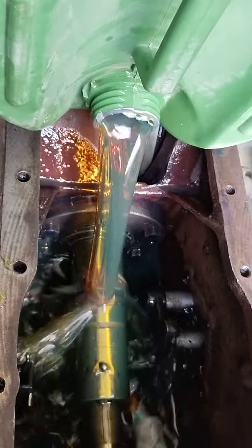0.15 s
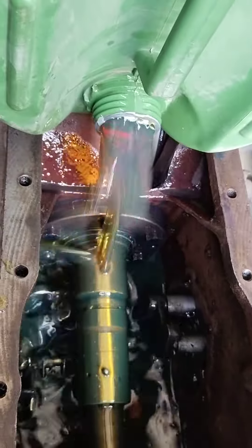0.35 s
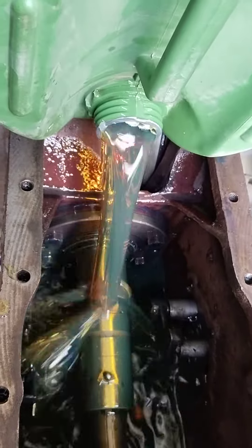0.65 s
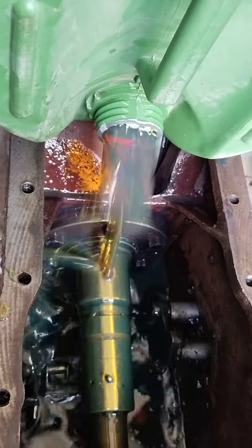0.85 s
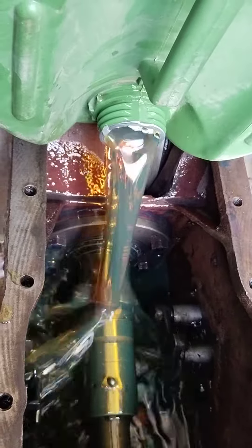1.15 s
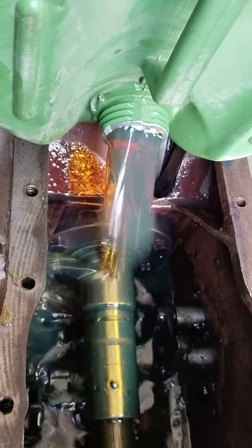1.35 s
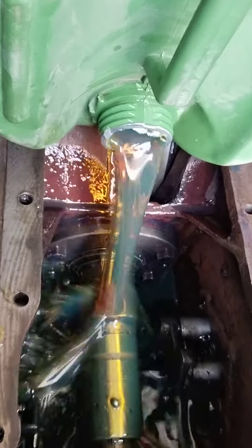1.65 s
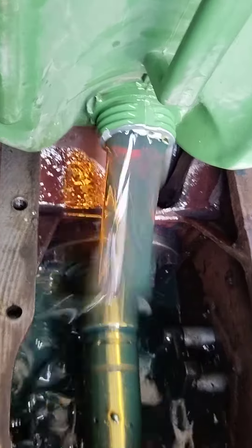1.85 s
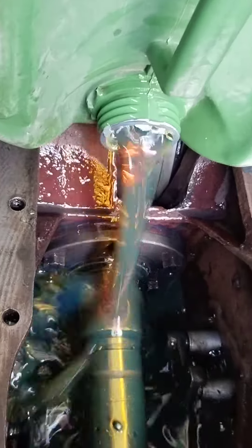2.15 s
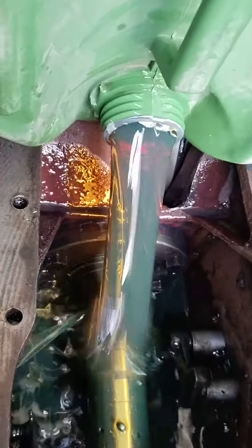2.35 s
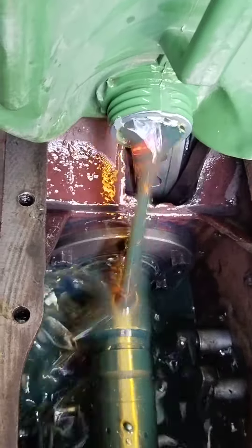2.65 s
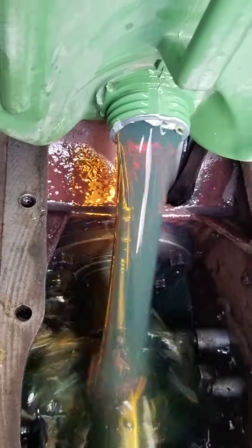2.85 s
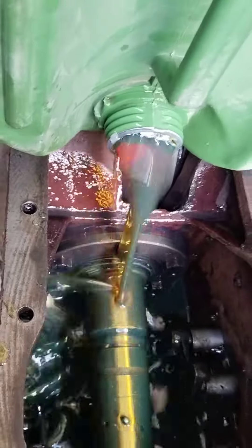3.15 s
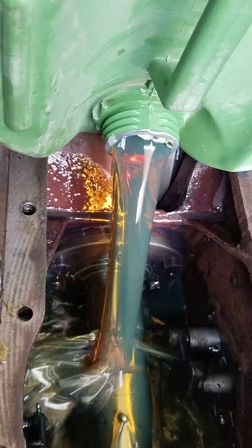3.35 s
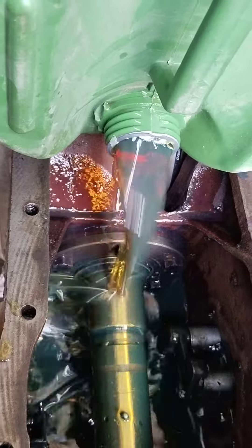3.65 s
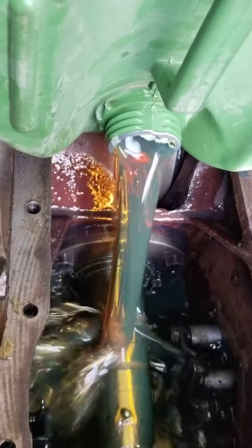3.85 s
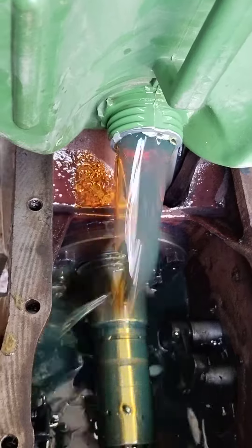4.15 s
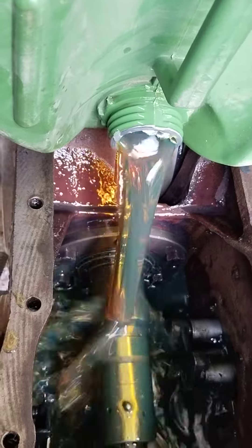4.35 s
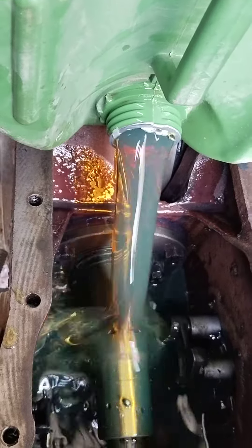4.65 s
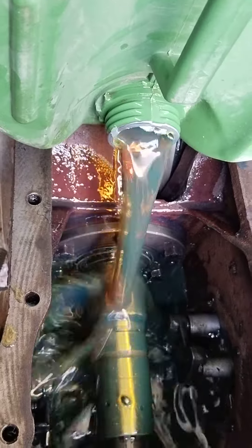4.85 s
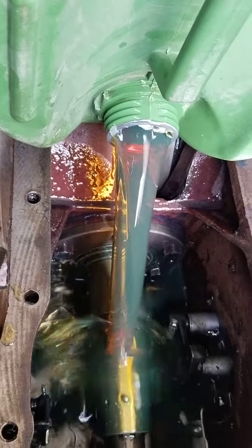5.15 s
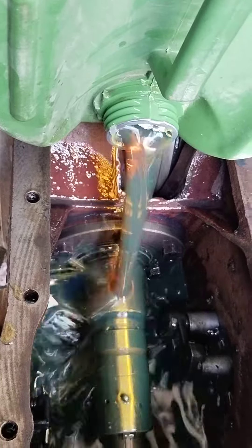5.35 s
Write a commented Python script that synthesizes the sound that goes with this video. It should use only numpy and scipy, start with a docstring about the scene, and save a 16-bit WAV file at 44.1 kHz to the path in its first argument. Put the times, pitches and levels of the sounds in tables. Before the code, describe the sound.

Rhythmic glugging in a shed, heard from close up: each surge of oil brings crackling wet smacks, fizzing spray and hollow bubbles, briefly ringing in the metal casing. Dull jug thumps start faint and become clearer after about a second. Behind lie a steady low rumble, a faint hum early on, three far echoing sparrow chirps and two slight creaks.

```python
"""A low rumble and a faint hum hold the shed, and at once thick oil slaps onto a shaft in an open gear case.
The oil is close and glugs from a plastic jug in surges: noise bursts make the splats and spray, and
sine waves the bubbles, air pockets and thumps of the jug as it gulps air.
Far off a sparrow chirps, a gliding whistle heard mostly through the shed's echoes.
Something creaks faintly: a train of slips knocking a few resonances."""
import sys
import numpy as np
from scipy import signal
from scipy.fft import rfft, irfft, next_fast_len
from scipy.io import wavfile
from scipy.ndimage import uniform_filter1d

SR = 44100
rng = np.random.default_rng(int(sys.argv[2]) if len(sys.argv) > 2 else 0)


def wav_out(sig):
    """Save sig, one row per channel (or a flat mono array), as 16-bit PCM at SR to the path in sys.argv[1]."""
    wavfile.write(sys.argv[1], SR, np.round(np.clip(np.atleast_2d(sig).T, -1, 1) * 32767).astype(np.int16))


N = 242550  # 5.5 s

# Shed air and rumble, spectrum before its level is set: pitch_hz [Hz], level_db [dB per Hz]
AIR_SPECTRUM = [(15, -30), (25, -8.5), (84, 10), (565, -20), (692, -15.5), (2460, -30), (3510, -56),
                (9430, -59), (10700, -40), (13900, -82), (22000, -120)]
AIR_DB = -53.5  # level at the start, dB
# Faint wavering hums in the shed: start_s [s], length_s [s], pitch_hz [Hz], level_db [dB]
HUMS = [(0, 0.77, 271.5, -62.5), (1.57, 0.15, 465, -66)]
# Faint buzzing creaks: start_s [s], length_s [s], first_slips and last_slips [per s], dry level_db [dB]
CREAKS = [(3.678, 0.21, 76.2, 77.2, -53), (4.161, 0.19, 72, 78.7, -59)]
# Resonances of the creaking thing: nominal pitch_hz [Hz], width_hz [Hz], level_db [dB]
CREAK_RESONANCES = [(1264, 80, -2), (1660, 73, 6), (1934, 33, 10), (2200, 39, -24)]
# The sparrow's two notes: delay_s [s], rise_s [s], hold_s [s], fall_s [s], top_hz [Hz],
# first_db and last_db [dB, added to the level of the chirp]
CHIRP_NOTES = [(0.015, 0.014, 0.017, 0.026, 5890, 9, 11.5), (0.1, 0.03, 0.0071, 0.021, 5105, 19.5, 2.7)]
# Each chirp of the sparrow: start_s [s], level_db [dB, before the note levels]
CHIRPS = [(1.493, -52.5), (3.207, -51.5), (4.843, -49.5)]
CHIRP_FOOT_HZ = 3830  # where each note starts and ends
# Glugs of the jug: gulp_s [s], nominal thump_db [dB], spray_db of the surge [dB]
GULPS = [(0.273, -67, -39), (0.789, -60, -45.5), (1.302, -42, -48.5), (1.774, -42, -45.5),
         (2.259, -48, -43.5), (2.688, -34.5, -44.5), (3.144, -42, -45.5), (3.591, -41, -48),
         (4.047, -40.5, -47), (4.503, -39, -48.5), (4.962, -40.5, -44), (5.424, -36.5, -47)]
THUMP_HZ, THUMP_SAG_HZ_PER_S = 193.4, 22.5  # thumps deepen as the air space in the jug grows
JUG_HZ, JUG_T60_S = 181.2, 0.48  # the jug wall rings on after each thump
SURGE_LEAD_S, SURGE_LAG_S = .21, .115  # a surge starts before its gulp and is choked after it
TRICKLE_DB = -63  # spray of the thin stream between surges, before the case rings
# Colour of oil on steel, relative spectrum: pitch_hz [Hz], level_db [dB per Hz]
OIL_COLOUR = [(290, -8), (500, -25), (734, -8.5), (1410, 1.5), (3420, 9), (9410, 1.5), (10700, -11.5),
              (13900, -42), (22000, -120)]
# Large bubbles under the stream: time_s [s], nominal level_db [dB], pitch_hz [Hz], t60_s [s]
# (pitch and decay before the adjustments in bubbles())
BUBBLES = [(0.199, -32, 1150, 0.052), (0.243, -34.5, 1065, 0.07), (0.243, -39.5, 750, 0.095),
           (0.304, -40, 705, 0.036), (0.385, -36.5, 1113, 0.038), (0.56, -38, 822, 0.12),
           (0.679, -34.5, 1120, 0.055), (0.733, -37.5, 924, 0.076), (0.83, -40, 1147, 0.054),
           (1.156, -26, 1122, 0.067), (1.225, -39, 1100, 0.056), (1.303, -41.5, 1098, .08),
           (1.322, -38, 1434, 0.071), (1.325, -45, 650, 0.064), (1.594, -36.5, 878, 0.049),
           (2.072, -38.5, 960, 0.026), (2.247, -23.5, 1080, 0.032), (2.262, -40.5, 717, 0.037),
           (2.617, -31, 1044, 0.026), (2.679, -33, 731, 0.14), (2.712, -36, 624, 0.036),
           (2.748, -34, 950, 0.082), (3.051, -41.5, 1002, 0.11), (3.133, -43, 684, 0.34),
           (3.174, -32, 638, 0.022), (3.177, -37, 1330, 0.053), (3.45, -35.5, 902, 0.071),
           (3.593, -41, 695, 0.057), (3.655, -46.5, 1012, 0.11), (3.899, -31, 1287, 0.035),
           (4.049, -36.5, 690, 0.11), (4.11, -28, 727, 0.083), (4.42, -33, 1013, 0.11),
           (4.512, -41.5, 725, 0.052), (4.966, -33.5, 750, 0.078), (5.355, -44, 1030, 0.071)]
# Loud air pockets trapped in the splash: time_s [s], nominal level_db [dB], pitch_hz [Hz], length_s [s]
# (pitch and length before the adjustments in pockets())
POCKETS = [(0.083, -29.5, 1760, 0.0086), (0.103, -35.5, 3370, 0.0072), (0.168, -34.5, 4010, 0.0079),
           (0.206, -23.5, 3480, 0.0036), (0.209, -28, 2326, 0.0055), (0.223, -37, 3900, 0.0058),
           (0.305, -35.5, 1950, 0.013), (0.389, -28, 2600, 0.0048), (0.411, -37.5, 4740, 0.0047),
           (0.703, -35, 2500, 0.0037), (0.714, -34, 3845, 0.0023), (0.744, -36, 2390, 0.005),
           (0.891, -29, 2636, 0.0056), (1.062, -35, 3725, 0.0058), (1.134, -36, 4090, 0.005),
           (1.233, -33.5, 1940, 0.0075), (1.36, -40, 2490, 0.0078), (1.67, -32, 3930, 0.004),
           (1.683, -29, 3545, 0.007), (1.776, -36, 4168, 0.0052), (1.873, -41.0, 3000, 0.0061),
           (2.071, -40.5, 3486, 0.008), (2.155, -30.5, 4380, 0.0063), (2.248, -36, 1813, 0.0071),
           (2.533, -32, 5050, 0.0063), (2.534, -35, 2910, 0.0058), (2.612, -33.5, 3430, 0.0089),
           (2.66, -32, 4440, 0.0032), (2.988, -37.5, 1826, 0.0088), (3.002, -33.5, 1860, 0.0033),
           (3.104, -33.0, 5430, 0.0028), (3.135, -32.5, 2615, 0.0058), (3.437, -37, 1940, 0.018),
           (3.509, -32, 5140, 0.0052), (3.534, -31, 2814, 0.011), (3.574, -32.5, 2017, 0.0064),
           (3.596, -37, 3480, 0.0042), (3.648, -39, 2228, 0.0074), (3.886, -34.5, 1918, 0.011),
           (3.91, -27, 2564, 0.011), (3.928, -20.5, 3458, 0.0054), (4.028, -33.5, 4090, 0.0054),
           (4.339, -37, 2020, 0.013), (4.371, -26.5, 3530, 0.0054), (4.384, -22.5, 2230, 0.0068),
           (4.42, -36, 4940, 0.0068), (4.42, -29, 2740, 0.01), (4.459, -29.5, 3460, 0.0083),
           (4.545, -21.5, 5070, 0.0038), (4.829, -35.5, 3240, 0.0076), (4.89, -30, 4730, 0.0065),
           (4.938, -26, 2014, 0.0037), (4.986, -34.5, 3600, 0.0054), (5.012, -36.5, 5350, 0.0029),
           (5.067, -42, 2014, 0.0096), (5.254, -34.5, 2285, 0.0034), (5.292, -30, 6500, 0.0044),
           (5.364, -32.5, 4350, 0.0054), (5.425, -32.0, 4900, 0.0021)]
# Lesser pockets at random in the surges: low_hz [Hz], high_hz [Hz], top level_db [dB], spread_db [dB]
SMALL_POCKETS = (1495, 5506, -38.5, 4.5)
SMALL_POCKET_S, SMALL_DELAY_S = 0.0062, .06  # nominal length; how long they go on after the gulp
# Loud sheets of oil that burst into fizz on the shaft: time_s [s], nominal level_db [dB]
SPLATS = [(0.044, -48.5), (0.0785, -32.5), (0.2755, -40.5), (0.382, -38.5), (0.411, -61), (0.596, -45.5),
          (0.6183, -35.5), (0.673, -49), (0.711, -39.5), (0.837, -43), (0.891, -45), (0.941, -55.5),
          (1.1107, -39), (1.195, -33.5), (1.226, -41.5), (1.3013, -48.5), (1.359, -39.5), (1.4501, -51.5),
          (1.5927, -35.5), (1.6788, -38.5), (1.8114, -47.5), (2.027, -51.5), (2.071, -34), (2.155, -40.5),
          (2.3137, -48), (2.516, -49), (2.535, -36), (2.654, -42), (2.7113, -40.5), (2.9807, -36.5),
          (3.049, -40), (3.121, -41), (3.4354, -36.5), (3.472, -36), (3.515, -42), (3.629, -38),
          (3.6516, -45.5), (3.709, -48), (3.897, -35.5), (3.911, -35.5), (3.9688, -40), (4.009, -36),
          (4.078, -42.5), (4.105, -41), (4.367, -28.5), (4.4273, -44), (4.46, -33), (4.5443, -25.5),
          (4.805, -41.5), (4.828, -36.5), (4.881, -44), (5.0365, -38), (5.2908, -55), (5.3567, -47),
          (5.422, -39)]
# Hollow resonances of the gear case: pitch_hz [Hz]
CASE_HZ = [700, 1059, 1890, 2217, 3405]
EDGE_HZ = 10800  # top of the band that is heard


def amp(db):
    """Turns dB into gain."""
    return 10 ** (np.asarray(db) / 20)


def evened(x):
    """Scales to rms 1."""
    return x / np.sqrt(np.mean(x ** 2) + 1e-20)


def smoothed(x, width):
    """Averages over width samples and scales to rms 1: a slow random wander."""
    return evened(uniform_filter1d(x, width))


def read(points, hz):
    """Reads a spectrum on a log-frequency axis."""
    f, value = np.transpose(points)
    return np.interp(np.log(hz + 1), np.log(f + 1), value)


def colour(x, db_of):
    """Filters x by a gain in dB given as a function of Hz."""
    size = next_fast_len(len(x))
    gain = amp(db_of(np.fft.rfftfreq(size, 1 / SR)))
    return irfft(rfft(x, size) * gain, size)[:len(x)]


def oil_colour(hz):
    """Gives the relative level in dB of oil on steel at each frequency."""
    return read(OIL_COLOUR, hz)


def add(mix, s, sound):
    """Mixes a sound in at s seconds."""
    part = mix[max(round(s * SR), 0):][:len(sound)]
    part += sound[:len(part)]


def resonate(x, hz, width):
    """Shifts the curve hz down to zero, smooths, and shifts back: a resonance of gain 1."""
    turn = np.exp(2j * np.pi * np.cumsum(hz * np.ones(len(x))) / SR)
    r = np.exp(-np.pi * width / SR)
    return 2 * (turn * signal.lfilter([1 - r], [1, -r], x / turn)).real


def narrow_band(x, hz, width):
    """Passes noise through the same resonance twice and scales to rms 1."""
    return evened(resonate(resonate(x, hz, width), hz, width))


def echoes(x, t60, gap):
    """Convolves with a decaying noise tail of energy 1 that starts gap seconds late."""
    t = np.arange(SR // 2) / SR
    tail = rng.standard_normal(len(t)) * amp(-60 * t / t60) * (t > gap)
    return signal.oaconvolve(x, tail / np.linalg.norm(tail))[:N]


def swell(t, length, rise):
    """Rises in about rise seconds, holds for about length seconds, then drops."""
    return (1 - np.exp(-(t / rise) ** 2)) / (1 + (t / np.clip(length, .003, .06)) ** 3.9)


def shed_air():
    """Steady coloured noise fills the shed, wavers and grows a little, with faint narrow-band hums."""
    waver_db = 1.2 * smoothed(rng.standard_normal(N), 5000)
    growth_db = 0.78 * np.arange(N) / SR
    air = evened(colour(rng.standard_normal(N), lambda f: read(AIR_SPECTRUM, f)))
    out = amp(AIR_DB + growth_db + waver_db) * air
    for s, length, hz, db in HUMS:
        noise = rng.standard_normal(round(length * SR))
        hum = narrow_band(noise, hz, 14) * signal.windows.tukey(len(noise), .3)
        add(out, s, amp(db) * hum)
    return out


def creaks():
    """Even slips knock a few resonances that sag, then drift upward; the shed echoes them."""
    out = np.zeros(N)
    for s, length, first, last, db in CREAKS:
        turns = np.cumsum(np.linspace(first, last, round(length * SR))) / SR
        clicks = np.diff(np.floor(turns), prepend=0)  # one at each whole turn
        slips = clicks + 0.028 * rng.standard_normal(len(turns))
        drift = np.interp(turns / turns[-1], [0, .3, 1], [1.04, .98, 1.03])
        body = sum(amp(level_db) * resonate(slips, hz * drift, width)
                   for hz, width, level_db in CREAK_RESONANCES)
        add(out, s, amp(db) * evened(body) * signal.windows.tukey(len(body), .4))
    return out + amp(4.0) * echoes(out, 0.16, 0.015)


def sparrow():
    """A rough gliding whistle, far off, mostly heard through the shed's echoes."""
    out = np.zeros(N)
    for start, db in CHIRPS:
        for delay, rise, hold, fall, top_hz, first_db, last_db in CHIRP_NOTES:
            t = np.arange(0, rise + hold + fall, 1 / SR)
            glide_hz = np.interp(t, [0, rise, rise + hold, t[-1]],
                                 [CHIRP_FOOT_HZ, top_hz, top_hz, CHIRP_FOOT_HZ])
            rough_db = 3.2 * smoothed(rng.standard_normal(len(t)), 120)
            level = amp(db + np.linspace(first_db, last_db, len(t)) + rough_db)
            level *= np.minimum(t / 0.002, 1)
            flutter = 1 + 0.03 * np.sin(2 * np.pi * 240 * t)
            flutter += 0.022 * smoothed(rng.standard_normal(len(t)), 60)
            whistle = np.sin(2 * np.pi * np.cumsum(glide_hz * flutter) / SR)
            add(out, start + delay, level * whistle)
    return out + amp(2) * echoes(out, 0.15, 0.003)


def gulps():
    """The air space in the jug thumps, a low tone that dies away over about a sixth of a second; the wall rings
    on, with a soft low gurgle."""
    out, t = np.zeros(N), np.arange(9000) / SR
    for s, db, _ in GULPS:
        thump_hz = THUMP_HZ - THUMP_SAG_HZ_PER_S * s
        rise = (1 - np.exp(-t / 0.0054)) ** 2
        thump = amp(4 - 60 * t / 0.16) * np.sin(2 * np.pi * thump_hz * t)
        wall = amp(-5 - 60 * t / JUG_T60_S) * np.sin(2 * np.pi * JUG_HZ * t)
        gurgle = narrow_band(rng.standard_normal(len(t)), 125, 110) * amp(3 - 60 * t / 0.15)
        add(out, s - .003, amp(db) * rise * (thump + wall + gurgle))
    return out


def surge_level():
    """The oil flow rises ahead of each gulp of air and is choked as the gulp comes."""
    t, level = np.arange(N) / SR, np.zeros(N)
    for s, _, db in GULPS:
        opening = np.clip((t - s + SURGE_LEAD_S) / 0.21, 0, 1)
        choking = np.clip((s + SURGE_LAG_S - t) / 0.27 + 0.044, 0, 1)
        level += amp(db) * opening * choking
    return level


def patchy_hiss():
    """Spray hisses in patches of time and pitch: noise whose short-time spectrum is lifted at random."""
    hz, _, z = signal.stft(rng.standard_normal(N), SR, nperseg=256, noverlap=192)
    across_pitch = uniform_filter1d(rng.standard_normal(z.shape), 7, axis=0)
    patches = evened(uniform_filter1d(across_pitch, 11, axis=1))
    gusts = smoothed(rng.standard_normal(z.shape[1]), 14)
    z = z * amp(oil_colour(hz)[:, None] + 5 * patches + 4.5 * gusts)
    return evened(signal.istft(z, SR, nperseg=256, noverlap=192)[1][:N])


def small_bubbles():
    """Small bubbles ring at random in 28 sizes, each a short rising sine that swells and dies."""
    drops = np.zeros(N)
    for hz in np.geomspace(650, 7000, 28):
        cycles = np.arange(round(50 * SR / hz)) * hz / SR
        shape = (1 - np.exp(-cycles / 5.8)) * np.exp(-cycles / 9.9)
        drop = shape * np.sin(2 * np.pi * cycles * (1 + 0.0011 * cycles))
        sizes = amp(4 * np.minimum(rng.exponential(1, N), 4))
        hits = sizes * (rng.random(N) < 45 / SR)  # about 45 a second
        drops += signal.oaconvolve(hits, drop / np.linalg.norm(drop) * np.sqrt(hz))[:N]
    return evened(colour(drops, lambda f: oil_colour(f) - 7.05 * np.log2((f + 50) / 3000)))


def spray(blows):
    """Hiss and small bubbles lie under each surge, churned up for a moment after every blow."""
    keep = np.exp(-1 / (0.0052 * SR))
    churn = signal.lfilter([1 - keep], [1, -keep], blows ** 2) ** 0.42  # compressed power of the blows
    hiss = patchy_hiss()
    wet = amp(-1) * hiss + amp(2.5) * small_bubbles()
    thin = .5 * hiss + evened(colour(rng.standard_normal(N), oil_colour))
    trickle = amp(TRICKLE_DB) * evened(colour(thin, lambda f: -6.5 * np.log2((f + 500) / 3000)))
    return (surge_level() + amp(-20.5) * churn) * wet + trickle


def bubbles():
    """Each bubble swells for a few cycles, creeps up in pitch, wobbles and dies."""
    out, t = np.zeros(N), np.arange(6000) / SR
    for s, db, hz, t60 in BUBBLES:
        decay_s = np.clip(0.89 * t60, .02, .2)
        shape = (1 - np.exp(-t / 0.0024)) ** 2 * amp(-60 * (t / decay_s) ** 1.25)
        wander = smoothed(uniform_filter1d(rng.standard_normal(len(t)), 200), 200)
        ring = np.sin(2 * np.pi * hz * (.98 * t + 0.65 * t ** 2))
        add(out, s - .003, amp(db) * shape / shape.max() * amp(2.5 * wander) * ring)
    return out


def scattered(kind, count):
    """Draws random rows (s, dB, Hz): count lesser events in each surge."""
    low_hz, high_hz, db, spread_db = kind
    when, size, pitch = rng.random((count * len(GULPS), 3)).T
    s = np.repeat([row[0] for row in GULPS], count) + SMALL_DELAY_S - when * SURGE_LEAD_S
    return list(zip(s, db - spread_db * size, low_hz * (high_hz / low_hz) ** pitch))


def pockets():
    """Shaken air rings in a narrow band that climbs as the pocket shrinks, inside a wider wet smack."""
    out, t = np.zeros(N), np.arange(3500) / SR
    small = [row + (SMALL_POCKET_S,) for row in scattered(SMALL_POCKETS, count=6)]
    for s, db, hz, length in POCKETS + small:
        ring_noise, smack_noise = rng.standard_normal((2, len(t)))
        pitch = hz * (.98 + 3.54 * t)
        ring = np.sin(2 * np.pi * np.cumsum(pitch) / SR)
        ring += 0.7 * narrow_band(ring_noise, pitch, 0.09 * hz)
        smack = .75 * narrow_band(smack_noise, pitch, .5 * hz)
        ring *= swell(t, 1.36 * length, 0.33 * length)
        smack *= swell(t, 2.0 * length, 0.26 * length)
        add(out, s - .0015, amp(db) * (ring + smack))
    return out


def splats():
    """Sheets of oil give a lumpy hiss that spreads and stops; no two tear alike, some build slowly."""
    out, t = np.zeros(N), np.arange(3500) / SR
    for s, db in SPLATS:
        hiss, lumps = rng.standard_normal((2, len(t)))
        a, b, size, bright, slow = rng.random(5)

        def sheet_db(f):
            """Colours one sheet: oil on steel with a random treble tilt and two random ripples."""
            tilt = (0.84 + 3.2 * bright) * np.log2((f + 50) / 3000)
            wide_ripple = 5 * np.sin(2 * np.pi * (a + f / 3100))
            fine_ripple = 4 * np.sin(2 * np.pi * (b + f / 1300))
            return oil_colour(f) + tilt + wide_ripple + fine_ripple

        sheet = evened(colour(hiss, sheet_db))
        rise = .0015 + .004 * slow ** 2
        level = amp(db + 4.1 * smoothed(lumps, 150))
        add(out, s - rise, level * sheet * swell(t, 0.016 + 0.007 * size, rise))
    return out


def scene():
    """The oil rings briefly in the cast case; jug, bird and air lie outside it."""
    blows = splats() + pockets() + bubbles()
    oil = blows + spray(blows)
    oil = oil + 0.71 * sum(resonate(oil, hz, 32) for hz in CASE_HZ)
    oil_and_echo = oil + amp(-10.5) * echoes(oil, 0.11, 0.00118)
    outside = gulps() + sparrow() + creaks() + shed_air()
    return (oil_and_echo + outside)[None]


def record(dry):
    """Limits the band: a steep low-pass removes the treble above EDGE_HZ."""
    low_pass = signal.firwin(511, EDGE_HZ, window=("kaiser", 9), fs=SR)
    return signal.oaconvolve(dry, low_pass[None], "same")


dry = scene()
out = record(dry)
wav_out(out)
```